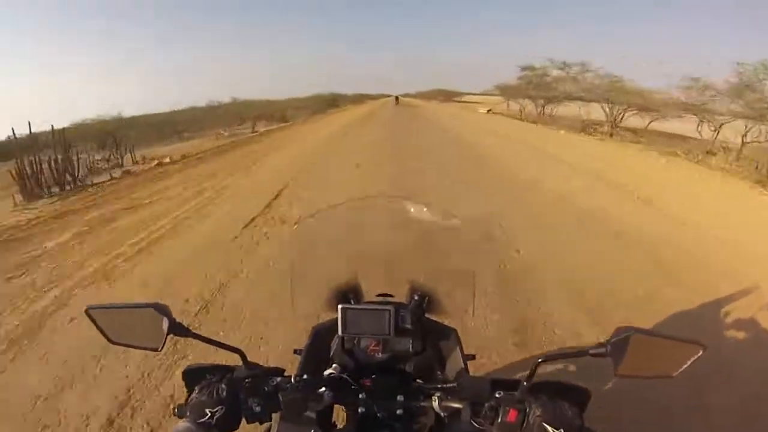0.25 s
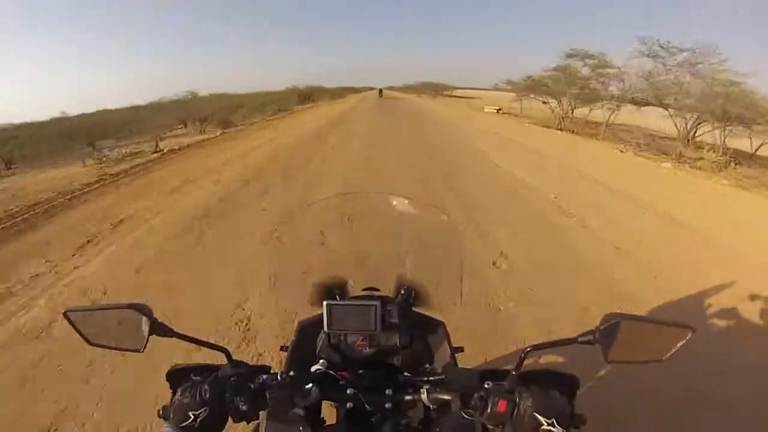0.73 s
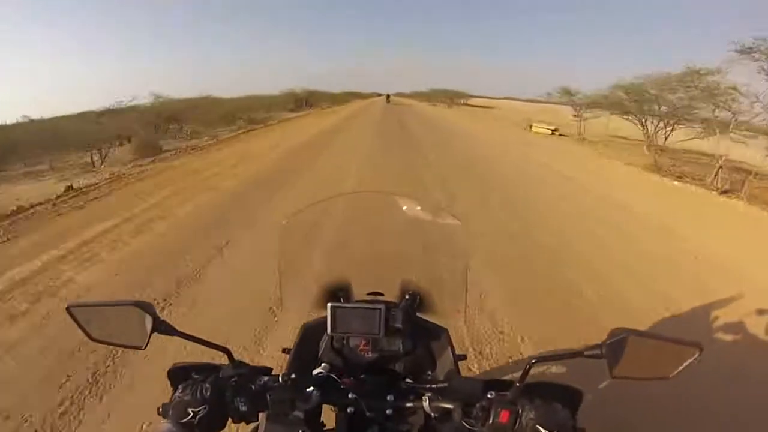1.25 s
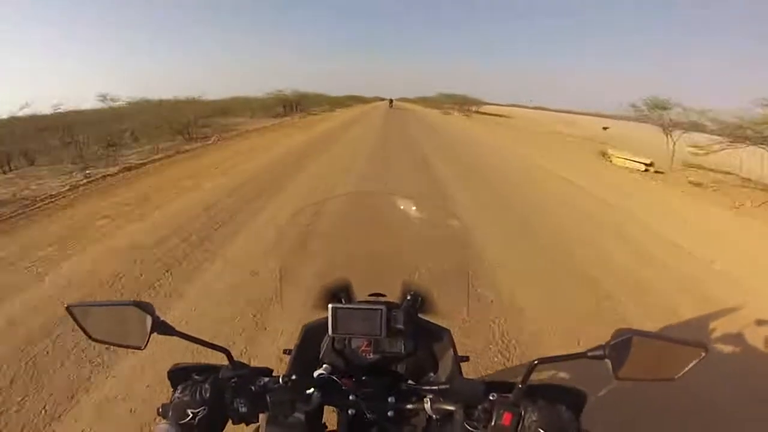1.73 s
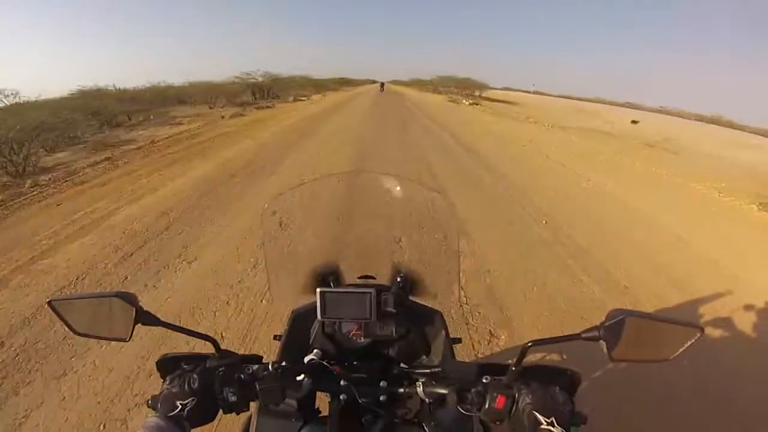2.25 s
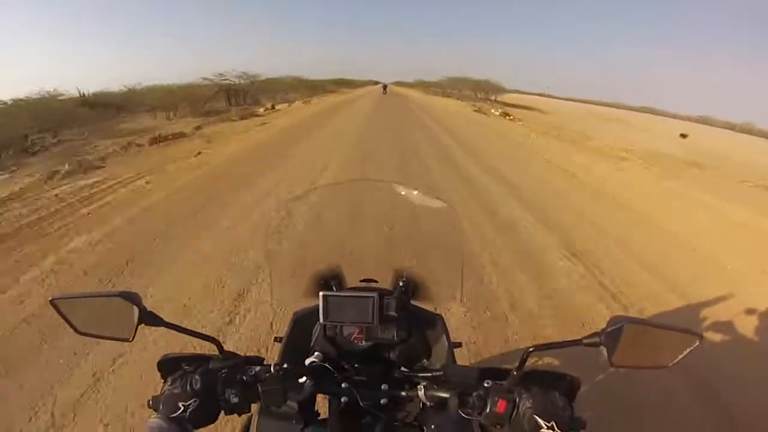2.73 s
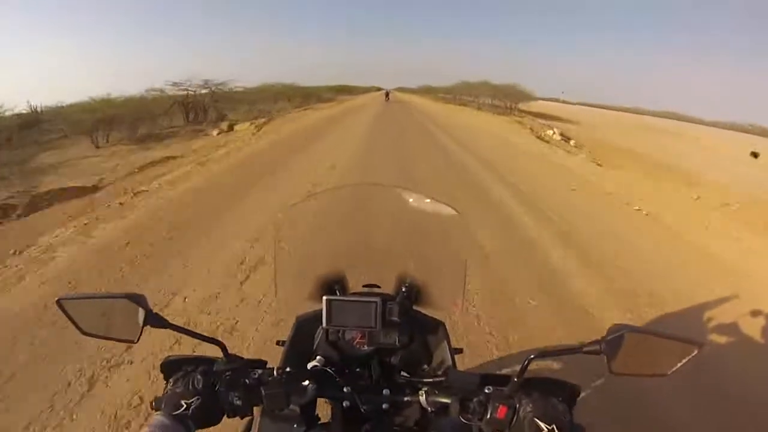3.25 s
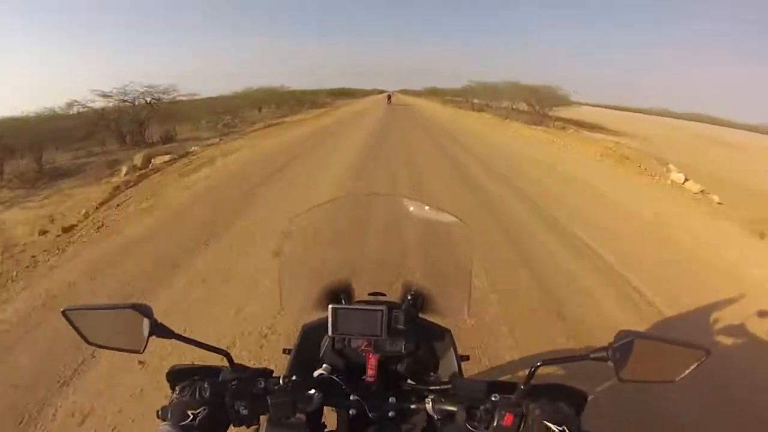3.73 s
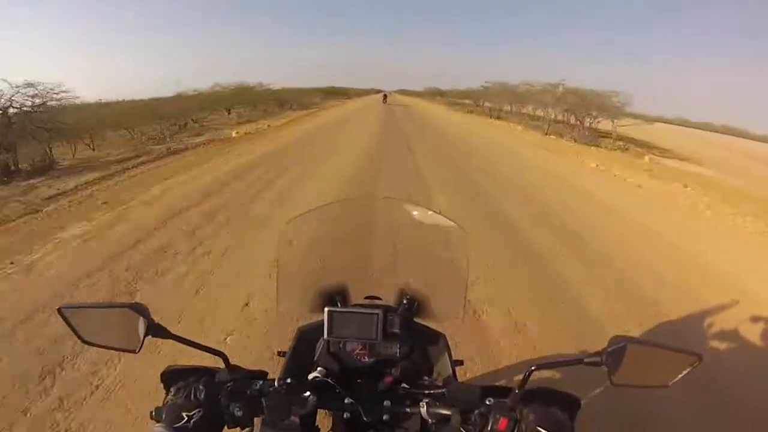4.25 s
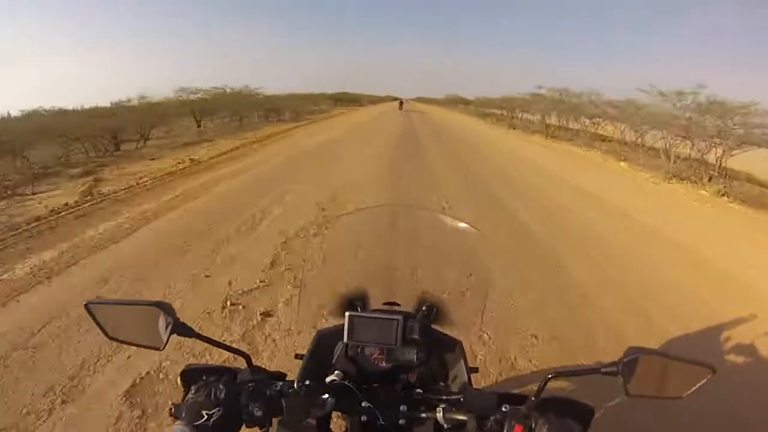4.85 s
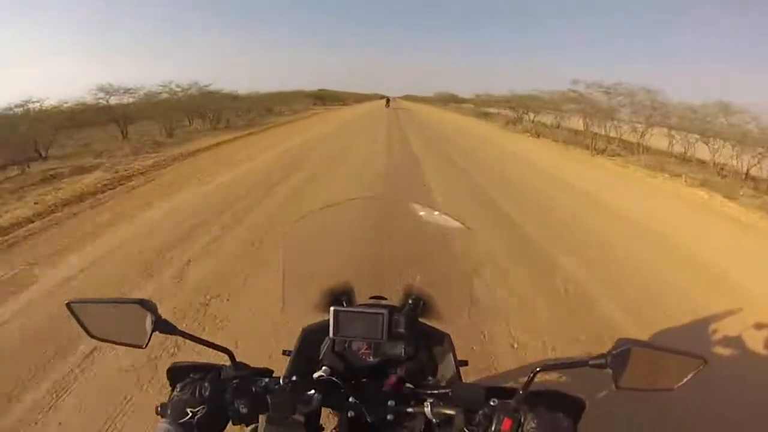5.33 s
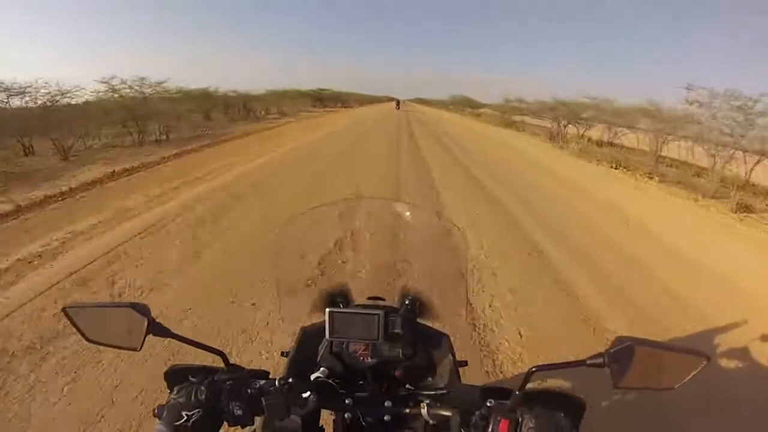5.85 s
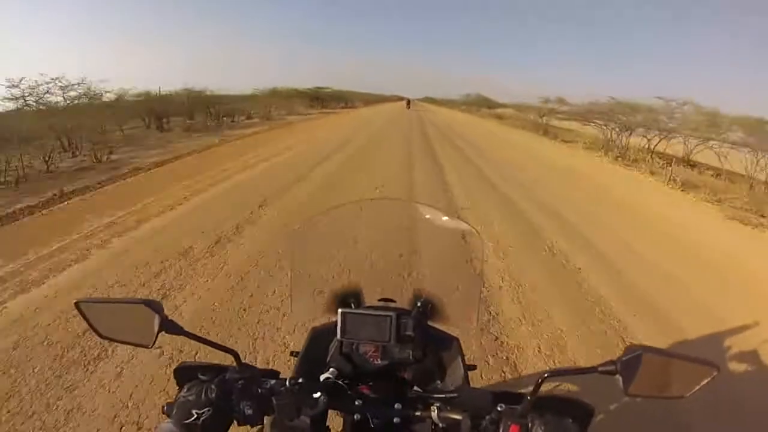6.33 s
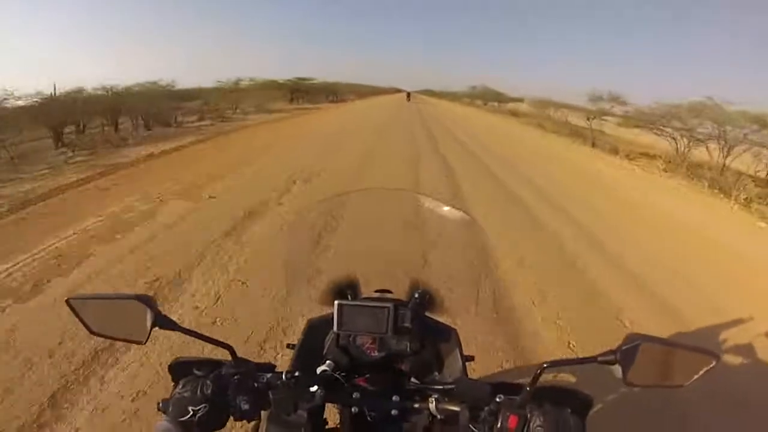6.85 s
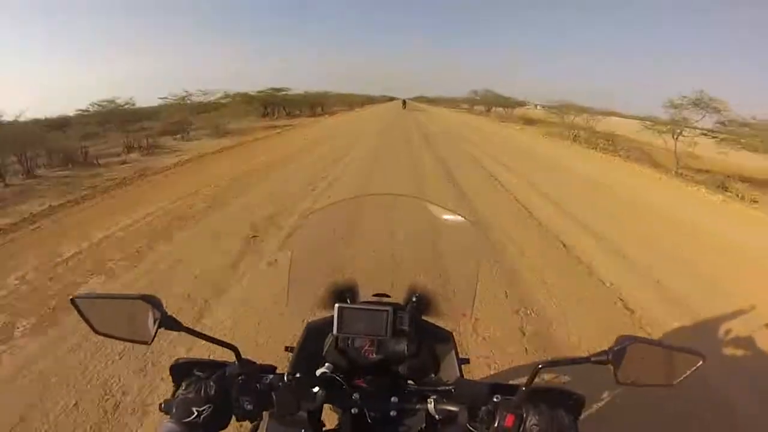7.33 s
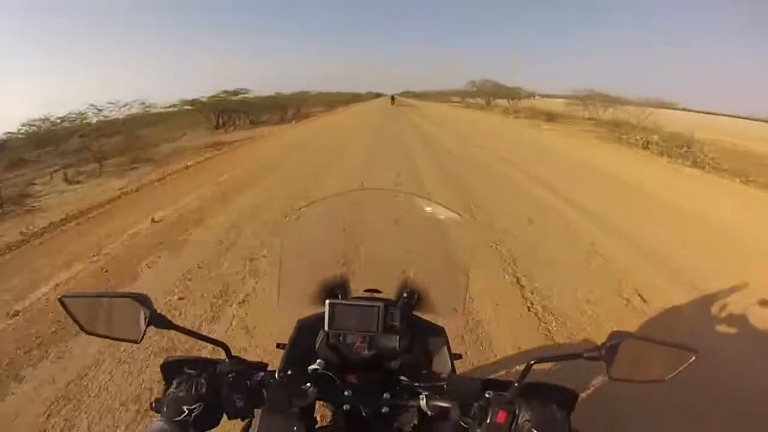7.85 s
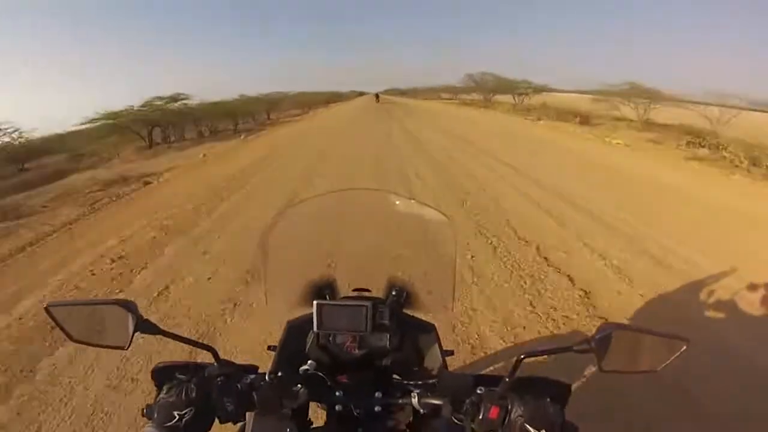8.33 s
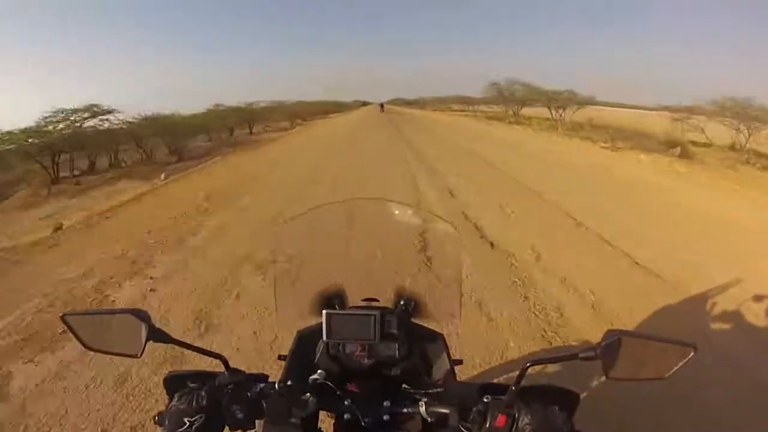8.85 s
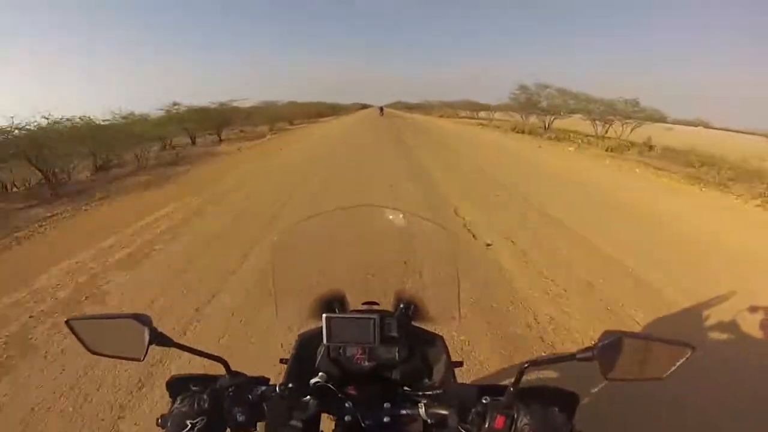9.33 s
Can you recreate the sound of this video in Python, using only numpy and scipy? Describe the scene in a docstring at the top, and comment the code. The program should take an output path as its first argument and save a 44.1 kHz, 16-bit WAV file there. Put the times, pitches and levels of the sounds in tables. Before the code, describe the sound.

A camera housing rattles and chatters on a motorcycle riding over gravel, above a steady engine drone and low wind buffeting.

```python
"""A motorcycle rides at steady speed on gravel, heard from a camera in a plastic housing on the rider.
From the start the road shakes the housing, which chatters in its mount and sways at about 20 Hz;
beneath it the engine drones and the slipstream buffets the housing with a low boom.
Stones jolt it throughout, hardest near 4.6 s. From about 7.7 s rattle and wind ease,
then rise again towards the end at 9.6 s."""
import sys
import numpy as np
from scipy import signal
from scipy.fft import rfft, irfft, next_fast_len
from scipy.io import wavfile
from scipy.ndimage import uniform_filter1d, map_coordinates

SR = 44100
rng = np.random.default_rng(int(sys.argv[2]) if len(sys.argv) > 2 else 0)


def master_out(mix):
    """Clip the mix to full scale and print it as 16-bit PCM to the path in sys.argv[1]."""
    frames = np.transpose(np.atleast_2d(mix))
    ceiling = np.clip(frames, -1, 1)
    pcm = np.round(ceiling * 32767).astype(np.int16)
    wavfile.write(sys.argv[1], SR, pcm)


N = 423360

# road shaking of the housing: t/s, level/dB
SHAKE_DB = [(0.0, -34), (0.36, -27), (0.51, -38.5), (0.91, -30), (1.24, -38), (1.32, -30), (2.06, -33),
            (2.1, -38.5), (2.58, -39.5), (2.85, -32), (3.18, -41.5), (3.55, -36.5), (3.81, -29.5),
            (4.35, -35.5), (4.61, -28), (4.68, -35), (5.95, -35), (6.58, -36), (7.52, -35.5), (7.71, -39.5),
            (8.35, -40), (8.97, -36), (9.18, -40), (9.6, -32)]
# stone jolts: t/s, force/dB
STONE_JOLTS = [(0.6699, -34), (0.818, -28), (1.3009, -30), (2.151, -35), (2.4234, -35), (2.7117, -29),
               (2.8619, -31), (3.1921, -34), (3.3124, -34), (3.5079, -35), (3.713, -28), (4.1545, -33),
               (4.2467, -27), (4.561, -24), (4.593, -25), (5.1522, -29), (5.6381, -28), (7.9628, -37),
               (9.1157, -33), (9.3776, -32)]
# rough gravel: centre t/s, half width/s, lift/dB
ROUGH_PATCHES = [(0.75, 0.015, 4), (2.462, 0.019, 3.5), (3.122, 0.014, 5), (3.415, 0.035, 4.5),
                 (4.073, 0.035, 2), (5.047, 0.079, 3.5), (5.635, 0.022, 6), (6.263, 0.021, 6),
                 (7.485, .05, 2.5), (8.71, .03, 1), (9.28, 0.023, 3.5)]
# brief lulls where the housing loses contact: centre t/s, half width/s, depth/dB
CONTACT_LULLS = [(0.657, .014, 3), (2.36, 0.021, 5), (3.495, 0.0083, 15), (4.157, 0.041, 3.5),
                 (4.859, 0.015, 6), (7.912, 0.039, 13), (8.332, 0.028, 4), (9.156, 0.02, 10),
                 (9.464, 0.027, 19)]
# spectrum of a plastic contact: f/Hz, level/dB
CONTACT_SPECTRUM = [(150, -41), (500, -4), (850, -14), (1300, -5.5), (2000, -2), (3000, -3.5), (3650, -8),
                    (4100, -11.5), (5000, -14.5), (6300, -12.5), (7600, -19.5), (9500, -23), (13000, -26),
                    (15500, -35)]
# housing resonances above that spectrum: f/Hz, width/Hz, lift/dB
HOUSING_MODES = [(1208, 51, 5), (2082, 330, 5), (2627, 210, 6.5), (3103, 390, 6.5), (3696, 150, 6.5),
                 (4535, 220, 7), (5370, 310, 7), (5670, 160, 4.5), (9000, 1320, 6.5)]
# engine firing rate: t/s, f/Hz
FIRING_HZ = [(0, 75), (1, 78), (2, 75), (3.6, 76), (4.7, 76.5), (5.3, 74.5), (6.5, 76), (7.3, 73),
             (9.6, 73)]
# engine orders: multiple of firing rate, relative level/dB
ENGINE_ORDERS = [(.5, -10), (1, 8.5), (1.5, -61), (2, -32), (2.5, -19), (3, -21)]
# boom around the firing rate: f/Hz, level/dB
BOOM_SPECTRUM = [(25, -40), (55, -12.5), (67, -2), (75, -3.5), (84, -4), (100, -18.5), (140, -62),
                 (400, -87)]
# buffets that swell the boom: centre t/s, length/s, peak level/dB
AIR_BUFFETS = [(0.18, .05, -23.5), (0.31, .09, -19.5), (0.92, .05, -19.5), (1.08, .045, -22),
               (1.355, .06, -21.5), (1.49, .04, -22), (2.5, .04, -25), (2.74, .1, -24),
               (3.555, .065, -18.5), (3.8, .06, -19), (4.03, .06, -20.5), (4.23, .06, -23),
               (4.585, .05, -24), (4.78, .065, -17.5), (5.3, .065, -20.5), (5.59, .04, -24),
               (6.11, .045, -22.5), (6.445, .06, -17.5), (6.645, .075, -19), (7.555, .05, -25),
               (8.9, .04, -26), (9.57, .06, -23)]
# slipstream strength, drives rumble and boom: t/s, level/dB
SLIPSTREAM_DB = [(0.0, -30.5), (0.32, -28.5), (0.49, -32), (1.43, -28.8), (2.44, -35), (2.76, -30),
                 (3.21, -33.5), (3.86, -30), (5.44, -32), (7.41, -34), (8.26, -38), (8.69, -34),
                 (9.23, -36), (9.6, -31.5)]
# turbulence on the housing: f/Hz, level/dB
TURBULENCE_SPECTRUM = [(8, -25), (27, -12), (45, 5), (70, 0.5), (108, 2), (128, -5.5), (180, -7),
                       (230, -15), (320, -17), (520, -27), (800, -31.5), (2000, -28.5), (15000, -121)]
# gravel shaking of the mount: f/Hz, level/dB
FLUTTER_SPECTRUM = [(10, 2.5), (24, 2), (42, 0.5), (70, 0.5), (200, -18.5), (600, -90)]
# air and tyre hiss: f/Hz, level/dB
HISS_SPECTRUM = [(500, -24), (2000, 13), (6000, -0.5), (10000, -16), (15500, -17)]


def rattle(rocking, contacts_per_s=3200, scatter_db=0.5, treble_hz=6000, flicker_db=1.66):
    """Dense plastic contacts, bunched by each shake, ring the housing."""
    force = contact_force(rocking)
    hits = (rng.random(N) < contacts_per_s / SR) * rng.choice([-1, 1], N)
    hits = hits * amp(scatter_db * rng.standard_normal(N))
    scrape = rng.standard_normal(N)
    contact = unit(unit(hits) + scrape)
    shell = contact_wander(filtered(force * contact, housing_response))
    shell = unit(shell) * np.sqrt(np.mean(force ** 2))
    treble = filtered(shell, lambda hz: hz ** 4 / (hz ** 4 + treble_hz ** 4))
    # harder contacts are shorter, so brighter
    treble_gain = unit(force) ** 0.13 * amp(flicker_db * wobble(53))
    return shell + treble * (treble_gain - 1)


def contact_force(rocking, trim_db=-1.78, rut_db=0.4, clear_db=9, lead_s=0.007, jolt_decay_s=0.0055):
    """Force of the housing on its mount, from road shake, ruts and stones."""
    t = np.arange(N) / SR
    shake_db = curve(SHAKE_DB)
    # gentle shaking breaks the rattle into puffs; hard shaking sustains it
    looseness = np.exp(-0.09 * (shake_db - shake_db.mean()))
    road_db = surface_db() + rut_db * looseness * wobble(24)
    # a stone lifts the housing clear just before its jolt lands
    gap_db = clear_db * sum(bump(at_s - lead_s, half_s=0.008) for at_s, _ in STONE_JOLTS)
    force = steady(amp(chatter_db(rocking, looseness)), window_s=0.092)
    force *= amp(shake_db + trim_db + road_db - gap_db)
    for at_s, db in STONE_JOLTS:
        after = (t >= at_s) & (t < at_s + 0.06)
        jolt = amp(db) * np.exp(-(t[after] - at_s) / jolt_decay_s)
        force[after] = np.hypot(force[after], jolt)
    return np.abs(uniform_filter1d(force, size=80))  # about 2 ms build-up


def chatter_db(rocking, looseness, knocks_per_s=130, knock_decay_s=0.005, stop_share=0.67):
    """Fast swings of contact force: sway, flutter and decaying knocks."""
    onsets = (rng.random(N) < knocks_per_s / SR) * 1.0
    knock_energy = signal.lfilter([1], [1, -np.exp(-2 / (knock_decay_s * SR))], onsets)
    knocks = np.sqrt(knock_energy)
    knocks = unit(knocks - knocks.mean())
    flutter = noise(FLUTTER_SPECTRUM)
    swing_db = looseness * (1.2 * rocking + 2.0 * flutter) + 0.65 * knocks
    # the mount stops the swing on the hard side; gaps stay deep
    return swing_db - stop_share * np.abs(swing_db)


def surface_db():
    """Rough road lifts the shaking briefly; in brief lulls the housing loses contact and the rattle drops."""
    rough_db = sum(db * bump(at_s, half_s) for at_s, half_s, db in ROUGH_PATCHES)
    lull_db = sum(db * bump(at_s, half_s) for at_s, half_s, db in CONTACT_LULLS)
    return rough_db - lull_db


def housing_response(hz):
    """Response of the plastic shell to one contact."""
    modes_db = sum(db / (1 + (2 * (hz - mode_hz) / width_hz) ** 2)
                   for mode_hz, width_hz, db in HOUSING_MODES)
    return minimum_phase(amp(spectrum_db(CONTACT_SPECTRUM, hz) + modes_db))


def contact_wander(x, depth_db=1.14, span_bins=12, span_frames=6):
    """The contact point wanders, so parts of the spectrum flare briefly."""
    spectra = signal.stft(x, nperseg=256)[2]
    flare = uniform_filter1d(rng.standard_normal(spectra.shape), span_bins, axis=0)
    flare = uniform_filter1d(flare, span_frames, axis=1)
    return signal.istft(spectra * amp(depth_db * unit(flare)), nperseg=256)[1][:N]


def sway(rate_hz=20, wander_hz=1.5):
    """The camera rocks on its springy mount at an unsteady rate."""
    drift = wobble(22)
    return np.sin(2 * np.pi * np.cumsum(rate_hz + wander_hz * (drift - drift.mean())) / SR)


def sway_throb(rocking, level_db=-35, waver_db=7.3):
    """The rocking itself, heard as a deep wavering throb."""
    return rocking * amp(level_db + waver_db * wobble(4))


def firing_phase_rad(wander_hz=0.875):
    """Phase of the engine's slightly unsteady firing."""
    return 2 * np.pi * np.cumsum(curve(FIRING_HZ) + wander_hz * wobble(6)) / SR


def engine_and_boom(firing_rad, bed_db=-29, eddy_db=5, wake_db=2, wake_delay_s=0.15, purity=0.67):
    """Exhaust orders, stirred by the air, merge with the buffeting boom; big swells are purest."""
    air_db = curve(SLIPSTREAM_DB)
    bed = amp(bed_db + air_db - air_db.mean())
    swells = np.sqrt(sum((amp(db) * bump(at_s, length_s * 2 / 3)) ** 2
                         for at_s, length_s, db in AIR_BUFFETS))
    # calm air follows each buffet
    calm_db = wake_db * sum(bump(at_s + wake_delay_s, half_s=0.11) for at_s, _, _ in AIR_BUFFETS)
    eddies = bed * amp(eddy_db * np.minimum(wobble(22), 1) - calm_db)
    level = np.hypot(eddies, swells)
    lift_db = 20 * np.log10(level / bed)
    exhaust = np.zeros(N)
    for order, db in ENGINE_ORDERS:
        # swells lift mainly the firing order
        order_db = db + wobble(16) - (order != 1) * lift_db / 2
        exhaust += amp(order_db) * np.sin(order * firing_rad + 0.92 * wobble(12))
    boom = noise(BOOM_SPECTRUM) * amp(-purity * lift_db)
    return steady(unit(exhaust) + boom, window_s=0.063) * level


def wind(trim_db=2, gust_db=1.1, eddy_db=1.6, eddy_hz=115, surge_db=0.6, road_share=0.3):
    """Slipstream rumbles over the housing; small eddies thump. Both grow on rough gravel."""
    air = noise(TURBULENCE_SPECTRUM)
    eddies = filtered(air, lambda hz: hz ** 8 / (hz ** 8 + eddy_hz ** 8) / (1 + (hz / 400) ** 2))
    rumble = (air - eddies) * amp(gust_db * wobble(35))
    thumps = eddies * unit(amp(eddy_db * wobble(45)))
    surge = np.minimum(wobble(20), 1)
    level_db = curve(SLIPSTREAM_DB) + trim_db + surge_db * surge + road_share * surface_db()
    return steady(rumble + thumps, window_s=0.079) * amp(level_db)


def hiss(level_db=-58, waver_db=2):
    """Faint wavering hiss of air and tyres."""
    return amp(level_db + waver_db * wobble(9)) * noise(HISS_SPECTRUM)


def amp(db):
    return 10 ** (np.asarray(db) / 20)


def unit(x):
    """x at rms 1."""
    return x / np.sqrt(np.mean(x ** 2) + 1e-20)


def steady(x, window_s):
    """x at local rms 1; faster flutter kept."""
    size = int(window_s * SR)
    power = uniform_filter1d(uniform_filter1d(x ** 2, size), size)
    return x / np.sqrt(np.abs(power) + 1e-12)


def curve(rows):
    """Rows of t/s, value, interpolated per sample."""
    return np.interp(np.arange(N) / SR, *np.transpose(rows))


def bump(centre_s, half_s):
    """Gaussian of height 1, down to 1/e at half_s from its centre."""
    x = (np.arange(N) / SR - centre_s) / half_s
    near = np.abs(x) < 4
    swell = np.zeros(N)
    swell[near] = np.exp(-x[near] ** 2)
    return swell


def wobble(knots_per_s):
    """Smooth random curve, rms about 1."""
    return map_coordinates(rng.standard_normal(4096), [np.arange(N) * knots_per_s / SR], mode="wrap")


def spectrum_db(rows, hz):
    """Rows of f/Hz, level/dB, interpolated over log frequency."""
    knots_hz, knots_db = np.transpose(rows)
    return np.interp(np.log(hz + 1), np.log(knots_hz + 1), knots_db)


def filtered(x, response):
    """x through the frequency response response(hz)."""
    size = 2 * next_fast_len(N * 3 // 5)
    return irfft(rfft(x, size) * response(np.fft.rfftfreq(size, 1 / SR)), size)[:N]


def minimum_phase(gain):
    """Response with this gain that rings only after a blow."""
    cepstrum = irfft(np.log(np.maximum(gain, 1e-6)))
    half = len(cepstrum) // 2
    return np.exp(rfft(np.r_[cepstrum[0], 2 * cepstrum[1:half], np.zeros(half)]))


def noise(spectrum):
    """Coloured noise, rms 1."""
    return unit(filtered(rng.standard_normal(N), lambda hz: amp(spectrum_db(spectrum, hz))))


def scene():
    """One rocking motion drives rattle and throb, over engine, wind and hiss."""
    rocking = sway()
    firing_rad = firing_phase_rad()
    throb = sway_throb(rocking)
    return (rattle(rocking) + throb + engine_and_boom(firing_rad) + wind() + hiss())[None]


def record(dry, top_hz=15500):
    """Band limit of the camera."""
    return filtered(dry[0], lambda hz: hz < top_hz)[None]


dry = scene()
out = record(dry)
master_out(out)
```